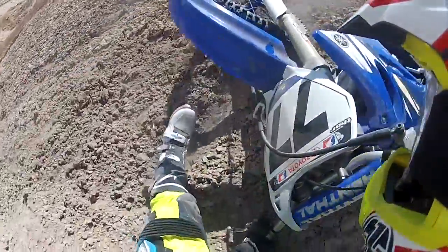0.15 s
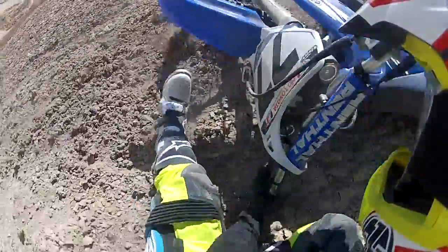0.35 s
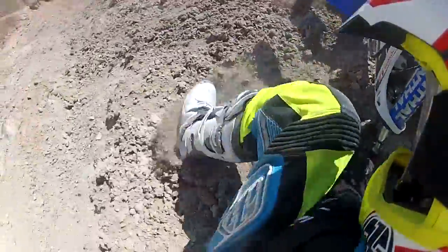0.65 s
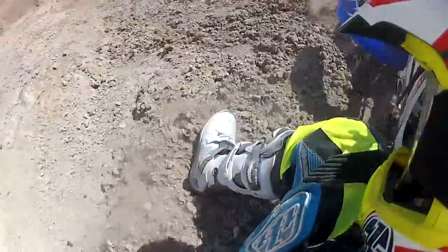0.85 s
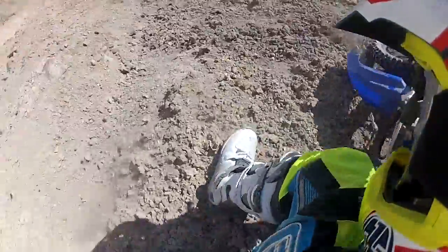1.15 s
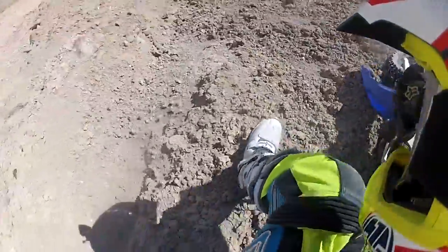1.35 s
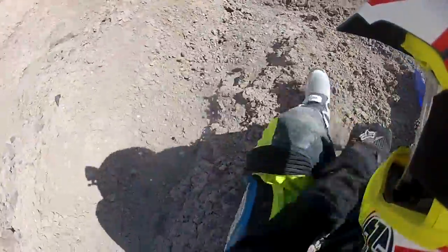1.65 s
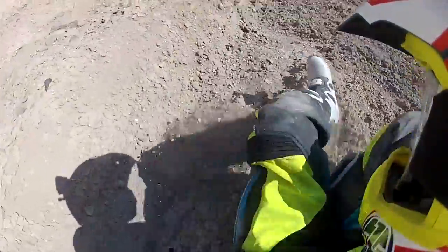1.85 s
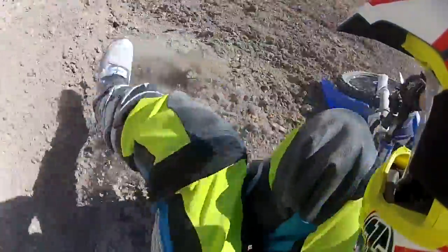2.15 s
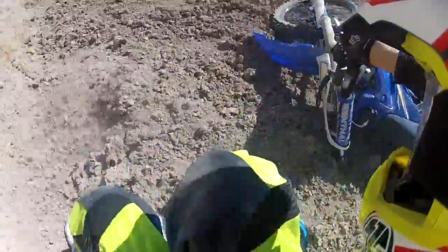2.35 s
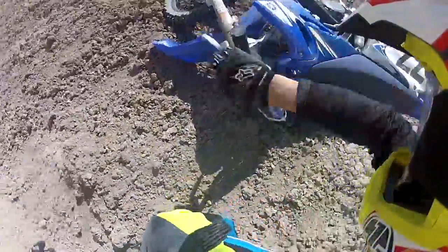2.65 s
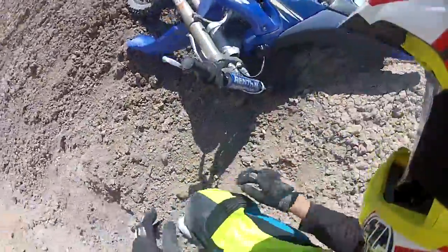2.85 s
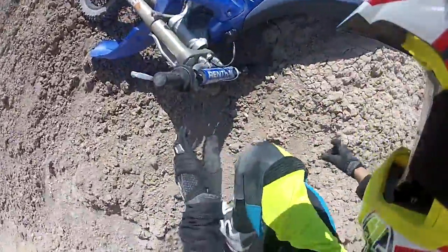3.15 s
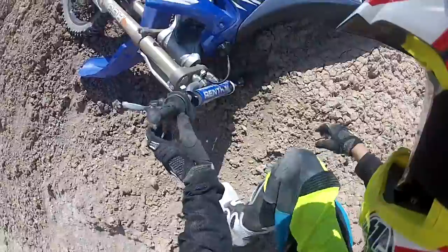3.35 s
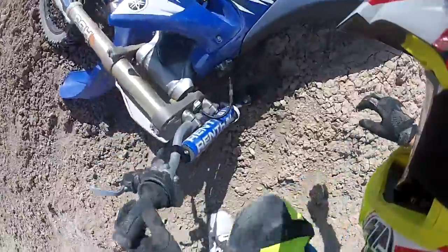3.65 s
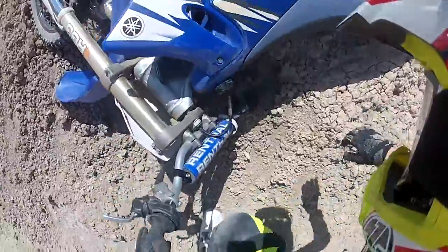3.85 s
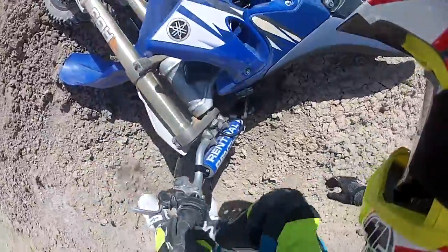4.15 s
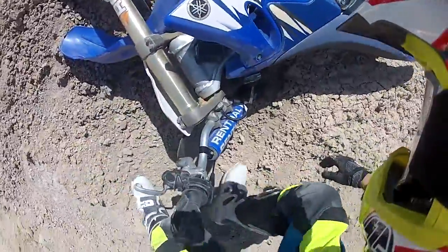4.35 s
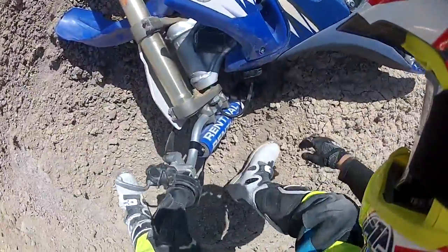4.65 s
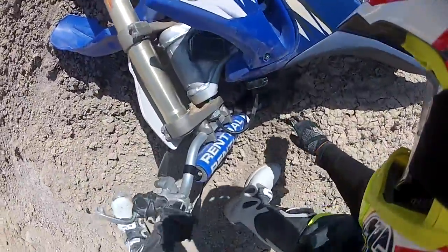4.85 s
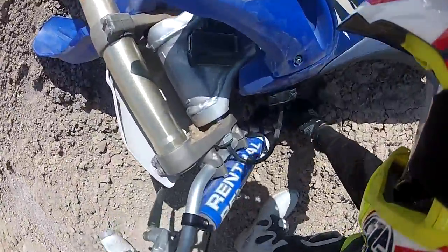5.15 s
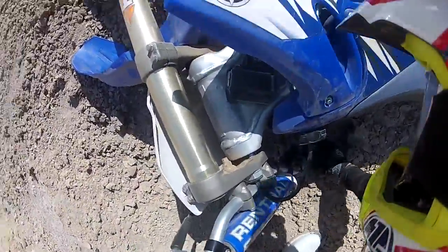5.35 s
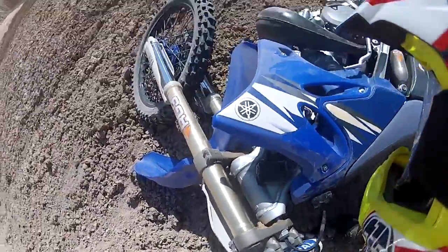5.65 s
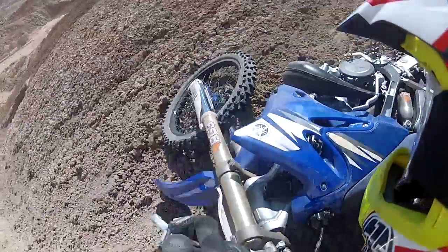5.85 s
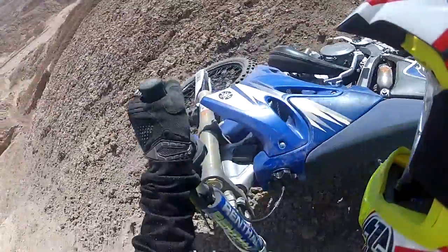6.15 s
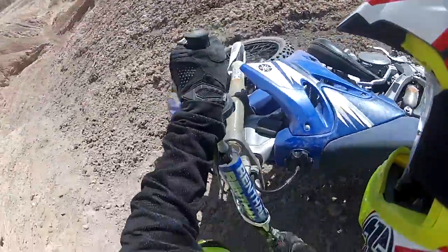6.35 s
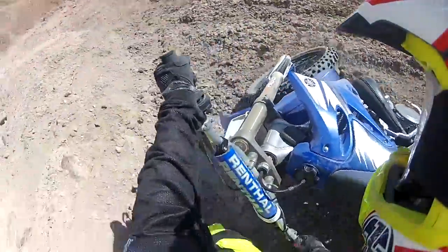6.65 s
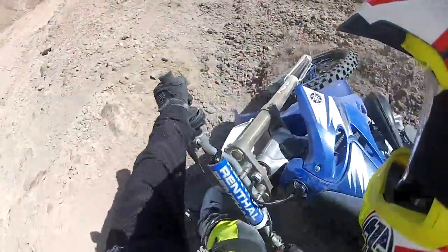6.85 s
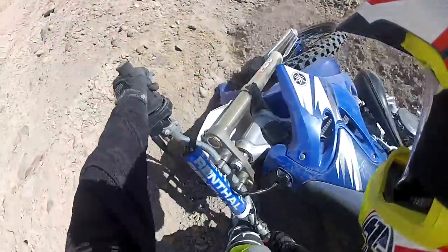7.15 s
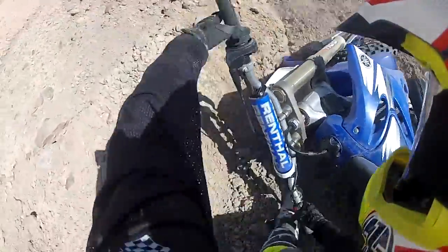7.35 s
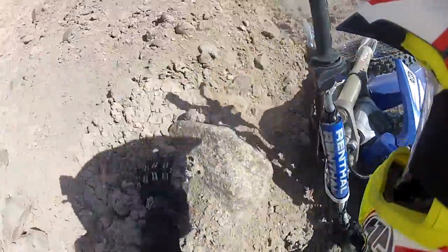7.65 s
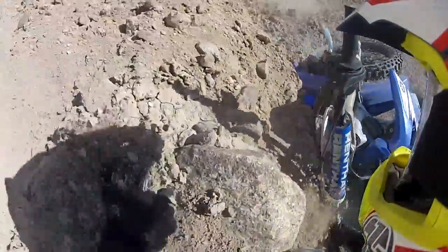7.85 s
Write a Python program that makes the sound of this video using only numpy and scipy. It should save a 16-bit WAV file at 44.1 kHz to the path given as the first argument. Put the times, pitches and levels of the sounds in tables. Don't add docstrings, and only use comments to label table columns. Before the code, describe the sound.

Muffled slowed close-up of soles crunching gritty soil, low wind rumble, a faint lever squeak, then harder knocks and ringing stones at the end.

```python
import sys
import numpy as np
from scipy import signal
from scipy.fft import rfft, irfft, next_fast_len
from scipy.io import wavfile
from scipy.ndimage import uniform_filter1d, map_coordinates

SR = 44100
rng = np.random.default_rng(int(sys.argv[2]) if len(sys.argv) > 2 else 0)


def attenuation_scalar(level_db):
    decades = np.asarray(level_db, float) / 20
    return 10 ** decades


def output_pcm(signal):
    pcm = np.clip(np.atleast_2d(signal).T, -1, 1) * 32767
    wavfile.write(sys.argv[1], SR, np.round(pcm).astype(np.int16))


N = 352800

# start_s, soil_db
LOAD = [(0, -41), (.6, -46.5), (1.0, -40.5), (1.5, -44), (2.1, -45), (2.5, -46), (3.3, -50.5), (3.6, -48.5),
        (3.8, -51.5), (4.6, -54.5), (4.9, -54), (5.3, -47.5), (5.7, -45), (6.35, -46), (6.42, -42),
        (7.0, -37.5), (7.3, -33.5), (7.55, -38), (8, -35.5)]
# freq_hz, density_db
SOIL = [(71, -37), (120, -3), (204, 2), (282, 0.5), (529, -0.5), (575, 0), (803, -13.5), (905, -17.5),
        (1100, -21.5), (1430, -26), (2420, -120)]
# freq_hz, density_db
GRIT = [(470, -6.5), (800, -13), (907, -9.5), (978, -9), (1760, -9.5), (1960, -8), (3020, -8), (3600, -21),
        (4680, -95), (7920, -120)]
# freq_hz, density_db
DUST = [(2000, -11), (3400, -3), (3910, 0), (4380, -6.5), (4880, -1.5), (5950, -11), (7740, -46),
        (13100, -120)]


def unit(x):
    return x / np.sqrt(np.mean(x ** 2) + 1e-20)


def load_gain():
    s, db = np.transpose(LOAD)
    return attenuation_scalar(np.interp(np.arange(N) / SR, s, db))


def wobble(rate):
    knots = rng.standard_normal(int(N * rate / SR) + 4)
    return map_coordinates(knots, [np.arange(N) * rate / SR])


def filtered(x, response):
    m = next_fast_len(N + 8192)
    return irfft(rfft(x, m) * response(np.fft.rfftfreq(m, 1 / SR)), m)[..., :N]


def colour(points):
    f, db = np.transpose(points)
    return lambda hz: attenuation_scalar(np.interp(np.log(hz + 1), np.log(f + 1), db))


def crunch(spectrum, per_s, spread_db, share):
    falls = rng.random(N) < per_s / SR
    sizes = attenuation_scalar(spread_db * np.minimum(rng.exponential(size=N), 3))
    grains = falls * rng.choice([-1, 1], N) * sizes
    mix = np.sqrt(share) * unit(grains) + np.sqrt(1 - share) * rng.standard_normal(N)
    return unit(filtered(mix, colour(spectrum)))


def even(x, seconds):
    power = np.abs(uniform_filter1d(x ** 2, size=round(seconds * SR)))
    return unit(x / np.sqrt(power + 1e-3))


def patchy(x, depth_db):
    z = signal.stft(x, nperseg=256)[2]
    field = uniform_filter1d(rng.standard_normal(z.shape), size=4, axis=0)
    field = uniform_filter1d(field, size=10, axis=1)
    return unit(signal.istft(z * attenuation_scalar(depth_db * unit(field)), nperseg=256)[1][:N])


def rise_hold_fall(t, start, hold, rise_db_s, fall_db_s):
    return -rise_db_s * np.maximum(start - t, 0) - fall_db_s * np.maximum(t - start - hold, 0)


def swells(rows, rise_db_s, fall_db_s):
    t = np.arange(0, N + 64, 64) / SR
    start, hold, *levels = np.transpose(rows)[..., None]
    shape_db = rise_hold_fall(t, start, hold, rise_db_s, fall_db_s)
    return [np.interp(np.arange(N) / SR, t, (attenuation_scalar(db + shape_db) ** 2).sum(axis=0)) for db in levels]


def soles():
    # start_s, hold_s, soil_db, grit_db, dust_db
    slides = [(0, 0.0047, -47, -65, -71), (.27, 0.14, -37.5, -51.5, -59.5), (.45, 0.12, -42, -52.5, -57.5),
              (.675, 0.088, -38, -46.5, -53.5), (1.19, 0.038, -40, -57, -61.5),
              (1.63, 0.12, -38.5, -50.5, -63.5), (1.88, 0.13, -43.5, -51, -55.5),
              (2.15, 0.017, -62, -54, -50), (2.89, 0.052, -47, -57, -68), (3.02, 0.034, -44, -57, -72),
              (3.21, 0.074, -49, -63, -82), (3.33, 0.052, -47.5, -58.5, -94),
              (3.7, 0.076, -72, -59.5, -67.5), (4.32, 0.087, -46, -73, -85), (4.77, 0.13, -45, -58, -67.5),
              (4.95, 0.24, -45, -60, -70), (5.41, 0.055, -37.5, -57.5, -66), (5.84, 0.11, -45.5, -54, -64),
              (6.07, .05, -46, -56, -64), (6.39, 0.21, -36, -55, -83), (6.77, 0.089, -38, -49.5, -76),
              (6.95, .15, -40, -55, -58.5), (7.14, 0.14, -49, -49.5, -70), (7.765, 0.054, -28.5, -38, -47)]
    # start_s, hold_s, soil_db, grit_db
    stamps = [(.09, .01, -69, -68), (.728, 0.014, -46, -48.5), (2.337, 0.028, -40, -49.5),
              (2.597, 0.0066, -60, -64), (2.66, 0.042, -45, -61), (3.383, 0.0075, -42, -58),
              (3.475, 0.0089, -56, -72), (3.54, 0.066, -58, -62), (3.95, 0.023, -66, -59.5),
              (4.066, 0.025, -39, -50.5), (6.75, 0.011, -34, -46), (7.048, 0.012, -37, -53),
              (7.095, 0.013, -39, -47), (7.163, 0.0063, -28.5, -45), (7.19, 0.018, -36, -49),
              (7.35, 0.0066, -36, -44), (7.396, 0.011, -33, -46), (7.452, 0.013, -28.5, -42.5),
              (7.625, 0.0091, -34, -42), (7.985, .02, -38, -45.5)]
    load = load_gain()
    slide_soil, slide_grit, slide_dust = swells(slides, rise_db_s=249, fall_db_s=185)
    stamp_soil, stamp_grit = swells(stamps, rise_db_s=1606, fall_db_s=619)
    stamp_dust = stamp_grit * attenuation_scalar(-9.5) ** 2
    soil_gain = np.sqrt(load ** 2 + slide_soil)
    grit_gain = np.sqrt((load * attenuation_scalar(-13.5)) ** 2 + slide_grit + stamp_grit)
    dust_gain = np.sqrt((load * attenuation_scalar(-21)) ** 2 + slide_dust + stamp_dust)

    stutter = wobble(30)
    soil_stutter = attenuation_scalar(0.91 * stutter + 1.46 * wobble(60))
    soil = even(soil_stutter * crunch(SOIL, 500, 0.68, share=0.25), 0.081)
    grit = patchy(crunch(GRIT, 400, 3.0, share=0.22), depth_db=1.1)
    dust = patchy(crunch(DUST, 600, 1.2, share=0.3), depth_db=1.3)
    fine = grit_gain * grit + dust_gain * dust

    case_hz, case_width_hz = 605, 450
    ring = lambda hz: 1 / np.sqrt(1 + ((hz - case_hz ** 2 / (hz + 1)) / case_width_hz) ** 2)
    heel = unit(filtered(soil, ring))
    fine_stutter = attenuation_scalar(0.88 * stutter + 0.89 * wobble(90))
    return soil_gain * soil + np.sqrt(stamp_soil) * heel + fine_stutter * fine


def clods():
    # start_s, peak_db, pitch_hz
    knocks = [(.215, -25, 353), (.458, -35, 370), (.679, -30, 555), (.741, -28, 400), (.924, -33, 412),
              (1.288, -23, 261), (1.237, -22, 418), (1.244, -24.5, 330), (1.218, -26, 330),
              (7.1835, -11, 420), (7.781, -14, 300), (7.316, -22, 300), (1.538, -30, 363),
              (1.684, -20, 431), (1.901, -23, 400), (1.94, -14.5, 314), (2.3444, -14, 400),
              (2.3476, -14, 400), (2.352, -18, 450), (2.3562, -22, 450), (4.072, -16, 513),
              (4.766, -30, 490), (5.449, -28, 470), (5.986, -29, 440), (6.382, -33, 406),
              (6.612, -11.5, 414), (6.7458, -9, 400), (6.7535, -24, 350), (6.7602, -15, 350),
              (7.1592, -9, 600), (7.151, -18, 330), (7.066, -20, 480), (7.099, -19, 520), (7.196, -26, 450),
              (7.452, -14, 480), (7.347, -18, 586), (7.399, -16, 400), (7.461, -17, 450), (7.505, -24, 369),
              (7.585, -28, 371), (7.627, -24, 515), (7.761, -8.5, 327), (7.8335, -11, 650),
              (7.952, -31, 498), (7.983, -29, 615),
              (2.604, -22, 353), (2.658, -17.5, 484), (2.724, -21, 507), (2.804, -21, 480),
               (2.888, -19, 425), (2.926, -21.5, 560), (3.219, -21, 300), (3.256, -23, 470),
               (3.386, -23, 554), (3.464, -29.5, 417), (3.545, -30.5, 470), (1.206, -27, 950),
               (1.256, -29, 920), (5.876, -34, 880), (5.432, -22, 250), (3.951, -30.5, 413),
               (4.801, -44, 460)]
    lead_s, crumble_t60_s = .004, 0.083
    blips, rubble = np.zeros(N + SR), np.zeros(N + SR)
    t = np.arange(SR // 8) / SR
    centre = t - lead_s - .0022
    late = np.maximum(t - lead_s, 0)
    for s, db, hz in knocks:
        at = round((s - lead_s) * SR)
        blip = np.cos(2 * np.pi * hz * centre) * np.exp(-(centre * hz / 0.78) ** 2)
        blips[at:][:len(t)] += attenuation_scalar(db - 4.5) * blip
        crumble = attenuation_scalar(db - 18.0 - 60 * late / crumble_t60_s) * (1 - np.exp(-late / 0.0023))
        rubble[at:][:len(t)] += crumble
    return blips[:N] + rubble[:N] * crunch(SOIL, 380, 2.9, share=0.32)


def stones():
    # start_s, peak_db, edge_over_peak_db
    hard_ticks = [(.1298, -30, -14), (1.9144, -53, -10), (1.9358, -27.5, -10), (1.9402, -19, -23),
                  (2.9264, -34, -34), (2.9374, -42, -21), (2.9986, -38, -31), (3.0809, -46.5, -6.5),
                  (3.3194, -40, -25), (4.315, -35.5, -11), (4.3375, -46, -25), (4.349, -49, -25),
                  (6.0843, -29, -14), (6.105, -29.5, -20), (6.1115, -36, -13), (6.1194, -41, -15),
                  (6.2387, -41, -15), (6.6104, -31.5, -36), (7.0883, -46, -2), (7.1608, -23, -32),
                  (7.2509, -34, -9), (7.2956, -30, -16), (7.3464, -20, -22), (7.507, -35, -11),
                  (7.7543, -24, -29), (7.8276, -19, -9), (7.8327, -17, -10), (7.8424, -21, -12),
                  (7.889, -46, -18), (7.9279, -15.5, -11.5)]
    # start_s, peak_db
    trickle = [
        (5.645, -45),
        (5.6553, -47),
        (5.6674, -45),
        (5.6875, -38),
        (5.7207, -42.5),
        (5.7703, -45),
        (5.7924, -49),
        (5.804, -44),
        (5.8286, -39),
        (5.8409, -41),
    ]
    # start_s, peak_db, edge_over_peak_db, t60_s
    crunches = [(0.6718, -32, -13, 0.097), (1.128, -32, -16, 0.08), (1.233, -44, -13, 0.059),
                (1.805, -38, -10, 0.088), (1.849, -37.5, -9, .05), (2.1466, -44, -11, 0.1),
                (2.162, -46, -1, .12), (2.18, -44, 4, 0.066), (2.194, -42, -12, 0.062),
                (5.868, -39, -16, .05), (5.886, -43, -12, .05), (5.905, -46, -8, .04),
                (5.968, -42, -12, .04), (7.098, -36, -18, .08), (2.677, -29, -11, 0.04),
                (2.6866, -28.5, -20, 0.037), (4.061, -42, -27, 0.08), (4.0746, -37.5, -29, 0.1),
                (4.7586, -54, -27, 0.067), (5.955, -39.5, -16, 0.16), (6.3877, -34, -23, 0.095),
                (6.7415, -22.5, -39, 0.067), (7.336, -22, -16, 0.07), (7.398, -21.5, -17, 0.053),
                (7.4512, -23.5, -22, 0.086), (7.459, -30, -17, 0.048), (7.6234, -27.5, -15, 0.11)]
    tick_t60_s, pebble_edge_db = 0.02, -7
    ticks = hard_ticks + [(s, db, pebble_edge_db) for s, db in trickle]
    contacts = [(*row, tick_t60_s) for row in ticks] + crunches

    blows = np.zeros((2, N + SR))
    t = np.arange(SR // 10) / SR
    for s, db, edge_db, t60 in contacts:
        volley = unit(rng.standard_normal(len(t)) * (rng.random(len(t)) < .25))
        volley[50] = 9 * (tick_t60_s / t60) ** 2
        shape = (1 - np.exp(-t / (.023 * t60))) * attenuation_scalar(-60 * t / t60)
        levels = attenuation_scalar([[db + 8], [db + edge_db + 10]])
        blows[:, round(s * SR):][:, :len(t)] += levels * shape * volley
    small = lambda hz: colour(GRIT)(hz) / np.sqrt(1 + (700 / (hz + 1)) ** 4)
    return filtered(blows[0, :N], small) + filtered(blows[1, :N], colour(DUST))


def scrapes():
    # start_s, hold_s, level_db, pitch_hz
    strokes = [(0.299, 0.1, -65, 1300), (1.127, 0.014, -55, 3220), (1.22, 0.043, -54, 1250),
               (1.207, .045, -59.5, 3900), (2.139, .06, -50.5, 2790), (5.875, 0.03, -56, 1400),
               (5.86, .1, -62, 3970), (7.203, .09, -56.5, 3300), (5.954, .025, -55, 3100),
               (6.39, 0.018, -52, 2000), (6.752, 0.024, -55, 3970), (6.84, 0.037, -57, 3080),
               (6.939, .12, -52, 3050), (7.029, .035, -53, 2500), (7.085, 0.016, -52, 5270),
               (7.096, 0.013, -48.5, 1390), (7.181, 0.024, -45, 2060), (7.771, .05, -46, 1600),
               (7.842, 0.011, -46, 2700), (7.937, .012, -43, 2950), (4.442, .035, -66, 2900),
               (2.679, .004, -58, 5400), (7.338, .012, -40, 2800), (1.205, .05, -57, 1000),
               (5.845, .015, -56, 2000)]
    lead_s, sharpness_q = .04, 3.9
    out, t = np.zeros(N + SR), np.arange(SR // 4) / SR
    f = np.fft.rfftfreq(len(t), 1 / SR)
    for s, hold, db, hz in strokes:
        grains = rng.standard_normal(len(t)) * (0.3 + (rng.random(len(t)) < .03))
        resonance = 1 / (1 + (sharpness_q * (f / hz - hz / (f + 1))) ** 2)
        ring = unit(irfft(rfft(grains) * resonance, len(t)))
        shape_db = rise_hold_fall(t, lead_s, hold, rise_db_s=700, fall_db_s=502)
        out[round((s - lead_s) * SR):][:len(t)] += attenuation_scalar(db + shape_db) * ring
    return out[:N]


def chips():
    # start_s, peak_db, pitch_hz
    struck = [(.001, -30, 4860), (.001, -32.5, 1500), (.678, -42, 4600), (1.135, -34, 3200),
              (1.233, -40, 2400), (1.249, -46, 4200), (1.938, -28, 950), (2.6808, -33, 5500),
              (4.316, -43, 3800), (6.085, -42, 1700), (6.7425, -27, 2300), (6.7428, -24, 1150),
              (1.134, -32, 950), (1.133, -40, 1550), (1.177, -36, 900), (1.234, -36, 950),
              (5.954, -41, 3280), (6.15, -42, 2100), (6.773, -42, 4300), (6.789, -36, 1200),
              (6.957, -34, 970), (7.089, -38, 5300), (7.16, -28, 1900), (7.756, -28, 2300),
              (7.8291, -15, 2300), (7.8353, -11, 2400), (7.8373, -20, 2600), (7.8435, -28, 3000),
              (.13, -34, 1500), (.131, -37, 4000), (6.086, -37, 4300), (1.202, -38, 1000),
              (1.262, -41, 1100), (7.8357, -9, 2750), (4.521, -42, 3200), (4.318, -38, 1000),
              (2.6812, -33, 3150), (2.687, -37, 3500), (2.695, -37, 2200), (7.398, -23, 2400),
              (7.452, -24, 2300), (7.459, -25, 3100), (.68, -36, 3800), (.676, -37, 2800),
              (.737, -36, 2000), (.749, -40, 3900), (.708, -39, 3000), (.717, -44, 4800),
              (1.141, -37, 2300), (1.143, -42, 4100), (5.8415, -42, 5000), (5.8285, -40, 2600),
              (6.12, -42, 2600), (6.112, -44, 2600), (7.896, -37, 2000), (7.929, -22.5, 1510),
              (7.998, -28, 2500), (7.998, -32, 4800),
              (7.8345, -10, 1500), (7.8295, -16, 2500), (7.099, -33, 1700), (7.183, -30, 2000),
                 (7.454, -33, 3600), (1.136, -40, 4200), (2.6815, -36, 5900), (7.8335, -20, 4800),
                 (7.8292, -22, 4900), (7.342, -25, 3000), (7.3475, -23, 2400), (7.343, -32, 5300),
                 (7.399, -33, 5000), (7.401, -27, 1800), (7.413, -31, 3100), (7.364, -30, 2000),
                 (5.877, -38, 1400), (5.883, -37, 1300), (5.879, -41, 2050), (5.868, -42, 1900),
                 (5.903, -40, 1300), (5.928, -42, 2200), (5.926, -42, 1400), (5.968, -41, 2800),
                 (5.986, -44, 1200), (2.682, -35, 1350), (2.692, -37, 1300)]
    out, t = np.zeros(N + SR), np.arange(SR // 4) / SR
    for s, db, hz in struck:
        decay = attenuation_scalar(db + 3 - 30 * t * hz / 3.5)
        out[round(s * SR):][:len(t)] += decay * np.sin(2 * np.pi * hz * t)
    return out[:N]


def thuds():
    # start_s, level_db, pitch_hz, t60_s
    rings = [(3.49, -25, 107, 0.11), (6.7545, -12, 172, 0.08), (7.4, -16, 170, 0.055),
             (1.9145, -19, 205, 0.038), (7.3472, -9.5, 632, 0.045), (3.21, -22.5, 192, .15),
             (7.414, -17.5, 134, 0.09), (7.4055, -9, 560, .03), (2.331, -21, 600, .06),
             (2.3375, -19, 480, .05), (2.3615, -21, 560, .06), (.6725, -24, 600, .05),
             (.7262, -21, 600, .04), (7.1675, -20, 620, .05), (7.4595, -15, 560, .04)]
    out, t = np.zeros(N + SR), np.arange(SR // 4) / SR
    for s, db, hz, t60 in rings:
        shape = attenuation_scalar(db - 60 * t / t60) * (1 - np.exp(-t * hz / 0.84))
        out[round(s * SR):][:len(t)] += shape * np.sin(2 * np.pi * hz * t)
    return out[:N]


def squeaks():
    # start_s, end_s, start_hz, end_hz, level_db
    pivot = [
        (5.866, 5.914, 1950, 3520, -52),
        (5.95, 5.972, 3100, 3350, -57),
        (6.035, 6.058, 2860, 2900, -64),
        (6.055, 6.084, 2890, 3050, -48),
        (6.082, 6.118, 3050, 3250, -55),
        (6.12, 6.149, 3320, 3510, -53),
        (6.147, 6.187, 3510, 3690, -62),
        (6.196, 6.226, 3810, 3960, -64),
        (6.25, 6.35, 5400, 5650, -71),
        (6.34, 6.46, 5620, 5950, -72),
    ]
    t, out = np.arange(N) / SR, np.zeros(N)
    for start, end, hz0, hz1, db in pivot:
        u = np.clip((t - start) / (end - start), 0, 1)
        pitch = hz0 + (hz1 - hz0) * u + 20 * wobble(80)
        swell = np.abs(np.sin(np.pi * u)) ** .4 * (u < 1)
        swell *= attenuation_scalar(db + 2 - 4 * u + 1.2 * wobble(90))
        out += swell * np.sin(2 * np.pi * np.cumsum(pitch) / SR)
    return out


def wind():
    # start_s, hold_s, thump_db, rumble_db
    gusts = [(0, 0.023, -31.5, -27), (.11, 0.13, -42.5, -48), (.43, 0.065, -47, -44.5),
             (1.14, 0.036, -42.5, -50), (1.71, 0.14, -42.5, -54), (1.9, 0.056, -40.5, -37),
             (2.0, .13, -45.5, -51), (2.15, 0.23, -42.5, -48), (2.97, 0.035, -36.5, -48),
             (3.02, 0.055, -31, -29.5), (3.115, 0.035, -29.5, -38), (3.205, 0.14, -30, -29),
             (3.38, 0.11, -31.5, -32), (3.53, 0.057, -42, -42), (3.81, 0.082, -40.5, -48),
             (3.965, 0.14, -37.5, -40.5), (4.19, 0.036, -32.5, -39), (4.27, 0.29, -38, -37),
             (4.62, 0.076, -34, -44.5), (4.8, 0.15, -34.5, -36.5), (5.0, 0.057, -32, -47),
             (5.235, 0.15, -38, -48), (5.55, .06, -34, -51), (5.62, .07, -31.5, -40),
             (5.72, 0.16, -40, -54), (5.98, 0.019, -62, -48), (6.405, 0.11, -35.5, -35),
             (6.83, 0.11, -36.5, -42.5), (7.39, 0.087, -42, -31), (7.6, 0.18, -41.5, -41.5)]
    # freq_hz, density_db
    thump_colour = [(15, -25), (25, -7), (50, -4.5), (80, -7), (110, -12), (200, -96), (400, -120)]
    # freq_hz, density_db
    rumble_colour = [(40, -120), (65, -0.5), (95, 4), (150, 1.5), (220, -6), (300, -15.5), (500, -40),
                     (1000, -120)]
    load = load_gain()
    thump_power, rumble_power = swells(gusts, rise_db_s=450, fall_db_s=337)
    lumps = attenuation_scalar(2.3 * wobble(30))
    thump = even(lumps * crunch(thump_colour, 40, 2.3, share=0.055), 0.31)
    rumble = even(lumps * crunch(rumble_colour, 80, 0.56, share=0.088), 0.16)
    thump *= np.sqrt(thump_power + (load * attenuation_scalar(-12)) ** 2)
    rumble *= np.sqrt(rumble_power + (load * attenuation_scalar(-8)) ** 2)
    return thump + attenuation_scalar(1.6 * wobble(20)) * rumble


def still_air():
    # freq_hz, density_db
    hiss_colour = [(18, -54), (30, 3), (71, -2.5), (99, -29), (943, -35), (1050, -32), (1230, -25),
                   (2440, -18.5), (5900, -31), (7670, -83), (13000, -120)]
    return attenuation_scalar(-62.5) * crunch(hiss_colour, 100, 1, share=0)


def scene():
    ground = soles() + clods() + stones()
    machine = scrapes() + chips() + thuds() + squeaks()
    return (ground + machine + wind() + still_air())[None]


def low_pass(x):
    return signal.sosfilt(signal.butter(12, 16510, fs=SR, output="sos"), x)


def record(dry):
    hold_hz, top_hz, end_hz = 12012, 15300, 16450
    band = filtered(dry, lambda hz: (hz < hold_hz / 2) * attenuation_scalar(-6 * (2 * hz / hold_hz) ** 16))
    sampled = band * (1 + 2 * np.cos(2 * np.pi * hold_hz * np.arange(N) / SR))
    hold = lambda hz: np.sinc(hz / hold_hz) / np.sinc(hz / (4 * hold_hz))
    main = filtered(sampled, lambda hz: hold(hz) * attenuation_scalar(-1.5 * (hz / top_hz) ** 6) * (hz < top_hz))
    top_band = lambda hz: (hz >= top_hz) * (hz < end_hz) * attenuation_scalar(-10 - 12 * (hz > 15880))
    top = filtered(sampled, lambda hz: hold(hz) * top_band(hz))

    mean = lambda x, size: np.abs(uniform_filter1d(x, size=size)) + 1e-20
    sudden = mean(top ** 2, size=200) / mean(top ** 2, size=3000) > attenuation_scalar(6) ** 2
    gate = np.minimum(2 * np.sqrt(mean(1. * sudden, size=500)), 1)

    hz, _, z = signal.stft(main, SR, nperseg=1024)
    local = uniform_filter1d(np.abs(z) ** 2, size=5, axis=-2)
    local = 36 * uniform_filter1d(local, size=4, axis=-1)
    thin = (hz > 12850) * (hz < 14000)
    starved = (local < attenuation_scalar(-87.5) ** 2) * thin[:, None]
    main = signal.istft(z * (1 - starved), SR, nperseg=1024)[1][..., :N]
    return low_pass(main + gate * top)


dry = scene()
out = record(dry)
output_pcm(out)
```